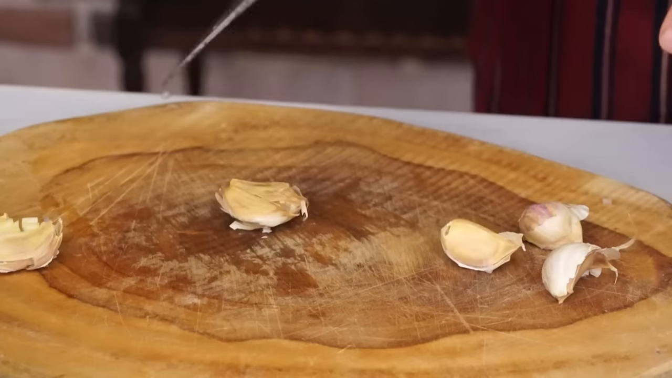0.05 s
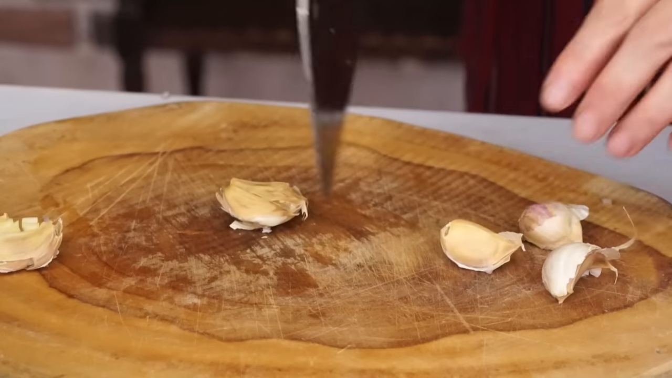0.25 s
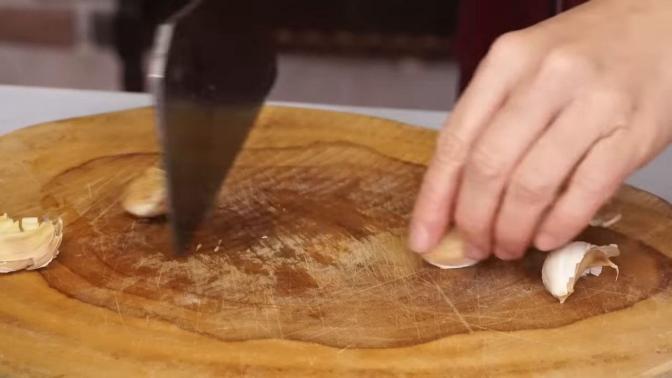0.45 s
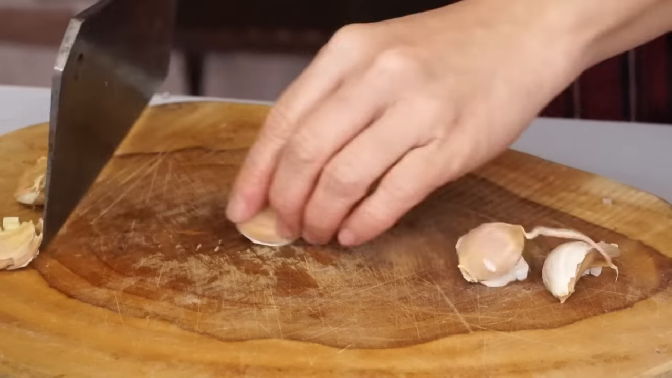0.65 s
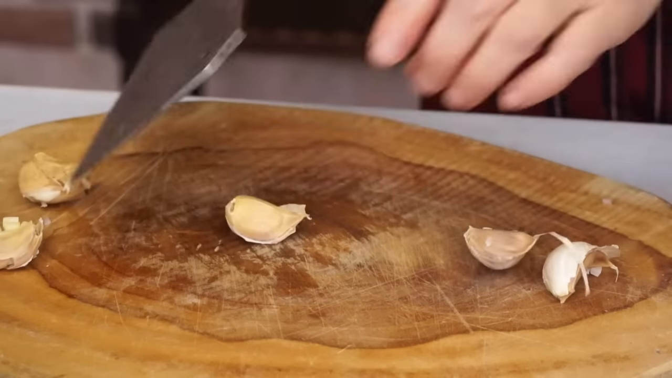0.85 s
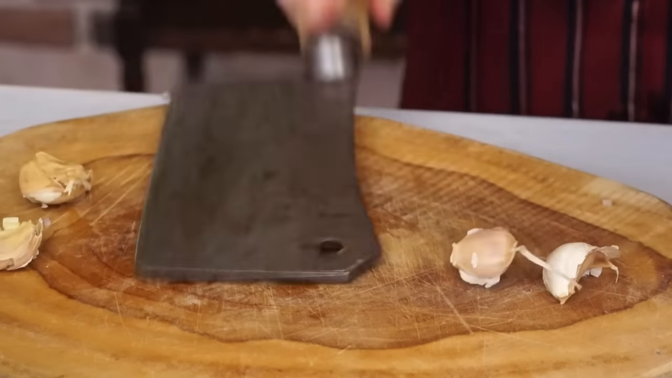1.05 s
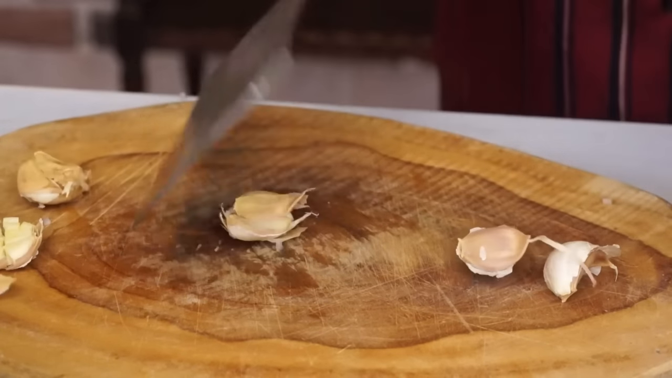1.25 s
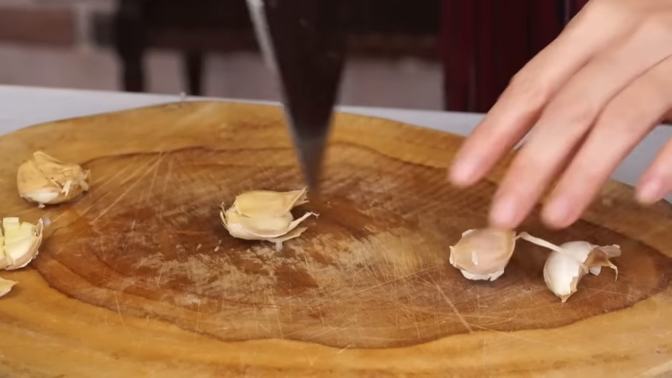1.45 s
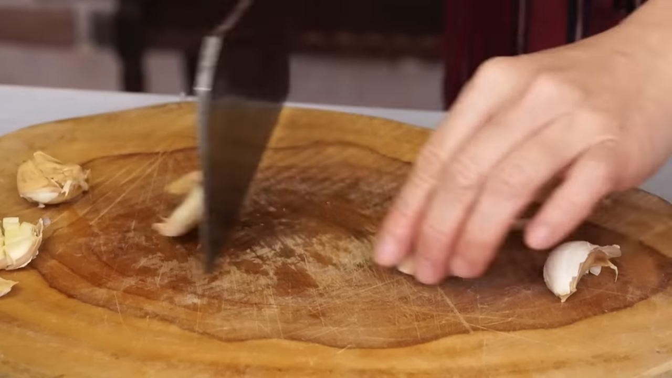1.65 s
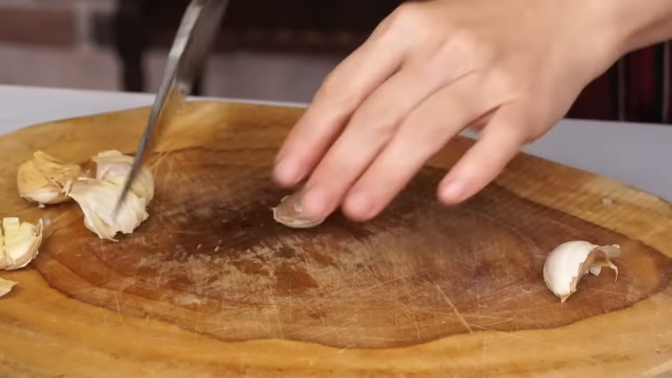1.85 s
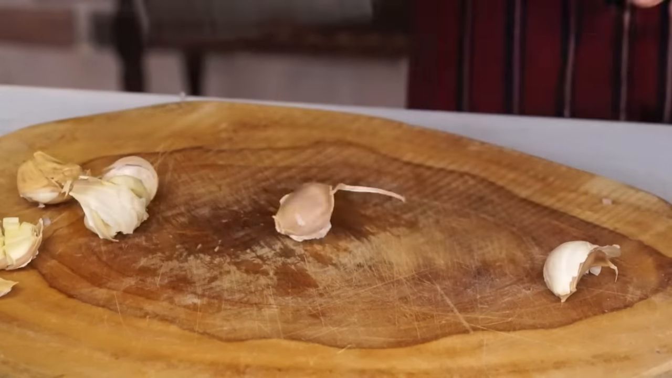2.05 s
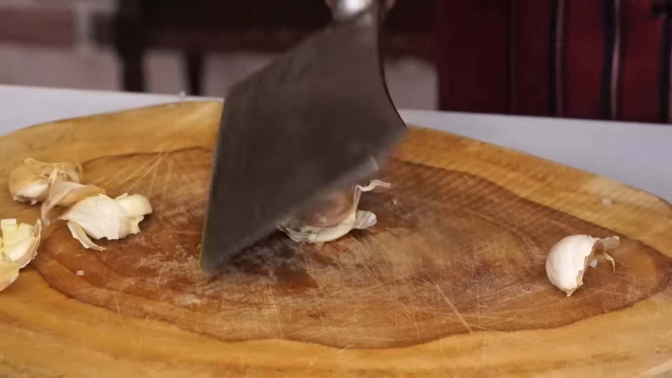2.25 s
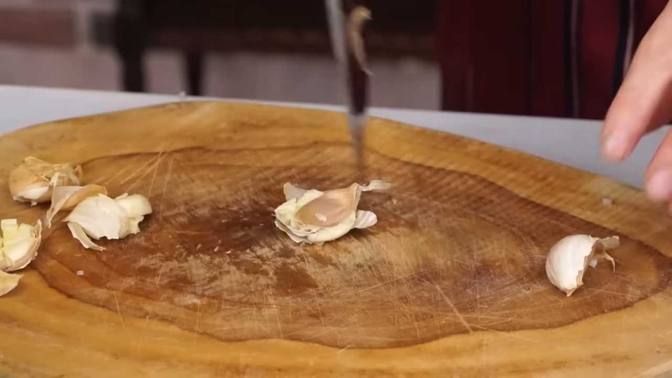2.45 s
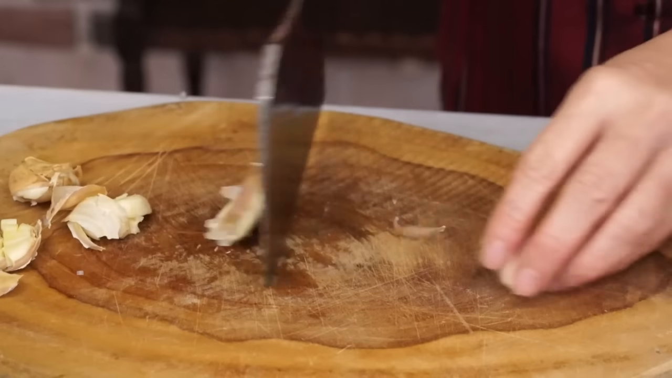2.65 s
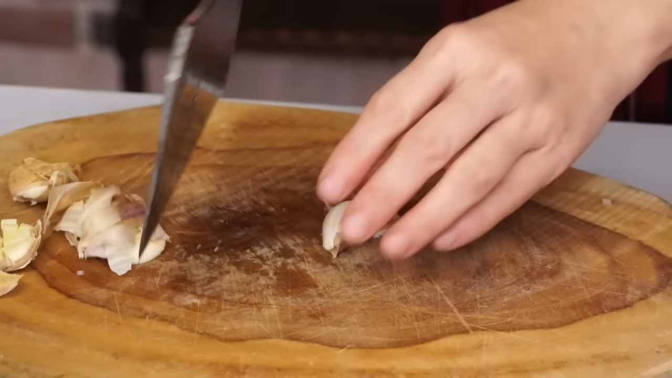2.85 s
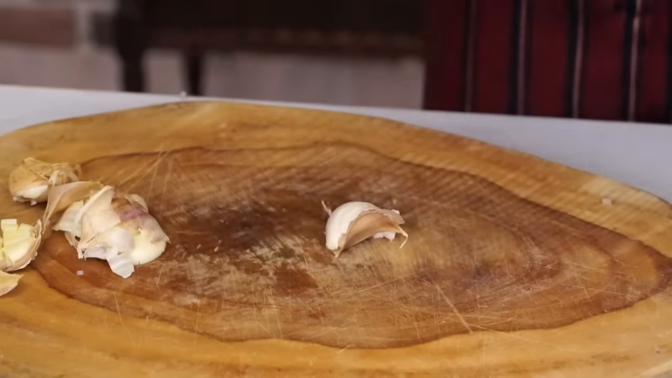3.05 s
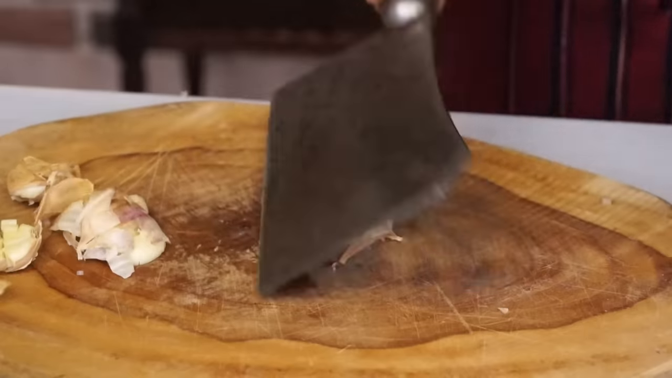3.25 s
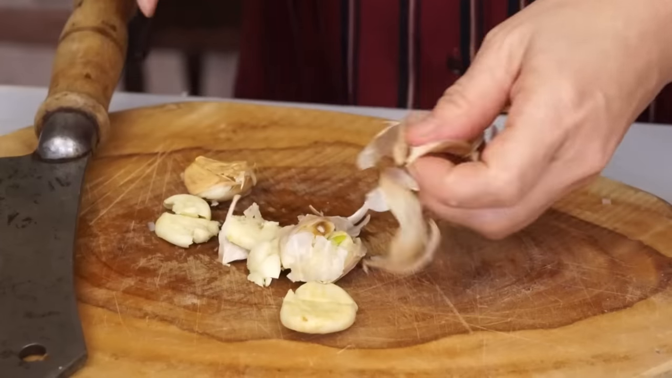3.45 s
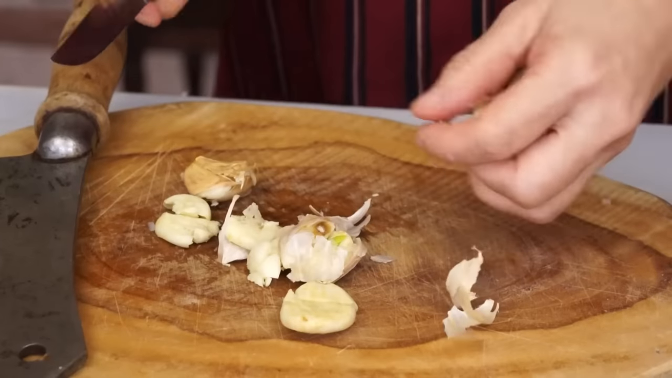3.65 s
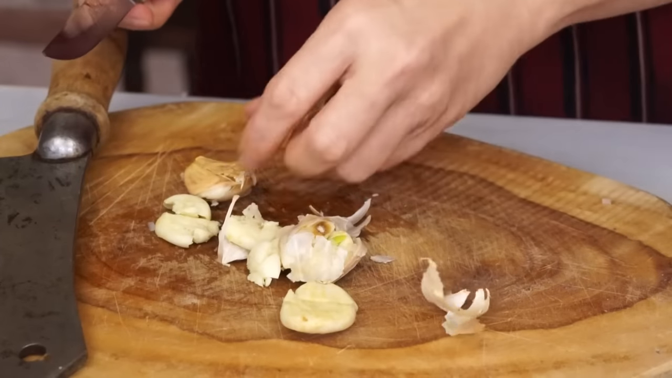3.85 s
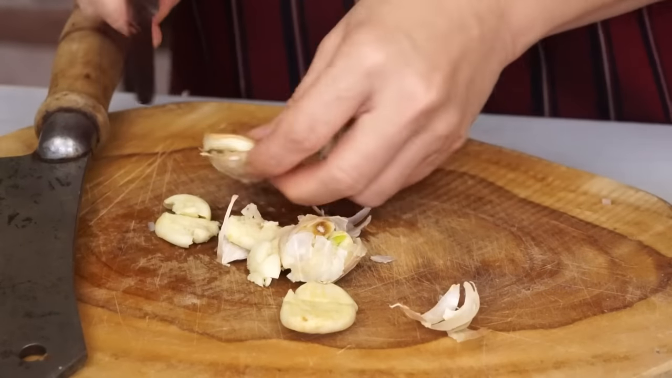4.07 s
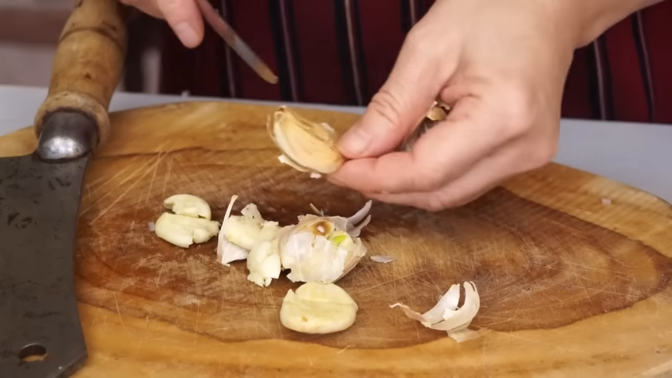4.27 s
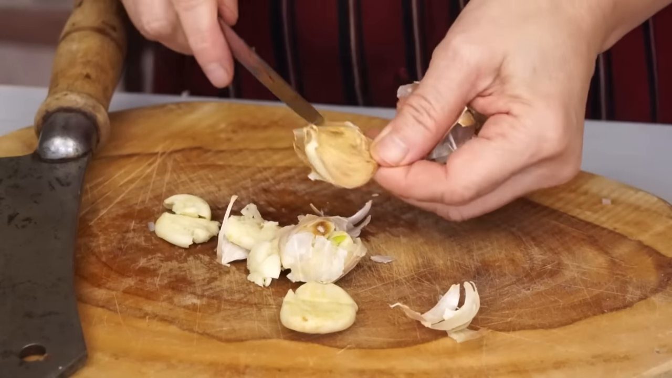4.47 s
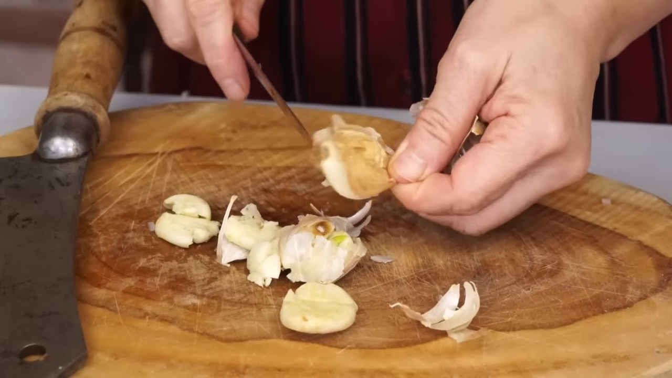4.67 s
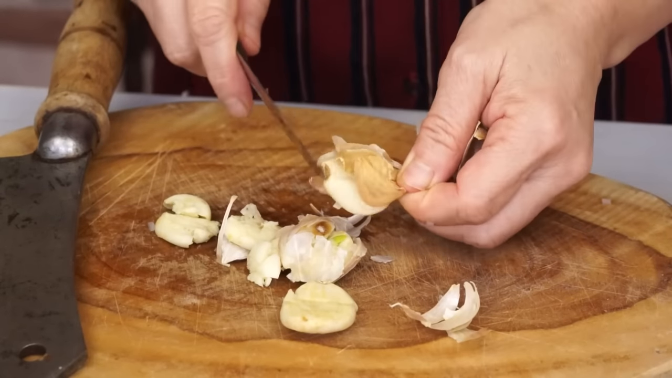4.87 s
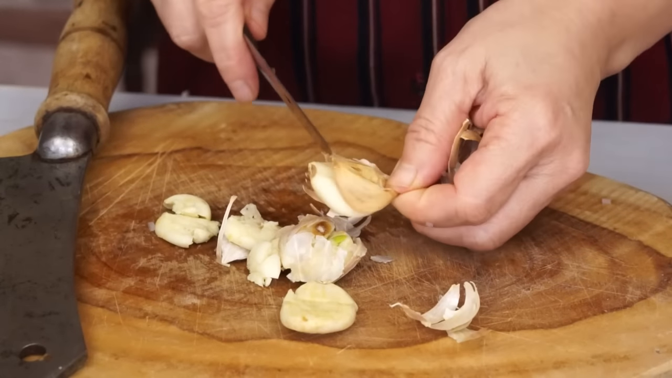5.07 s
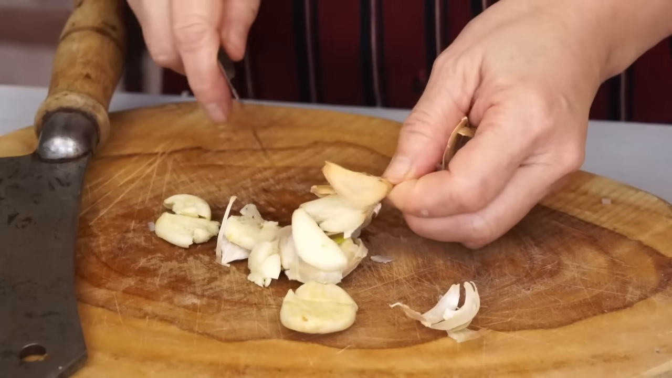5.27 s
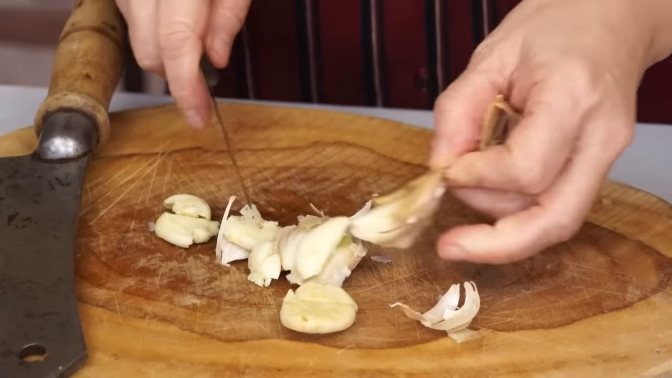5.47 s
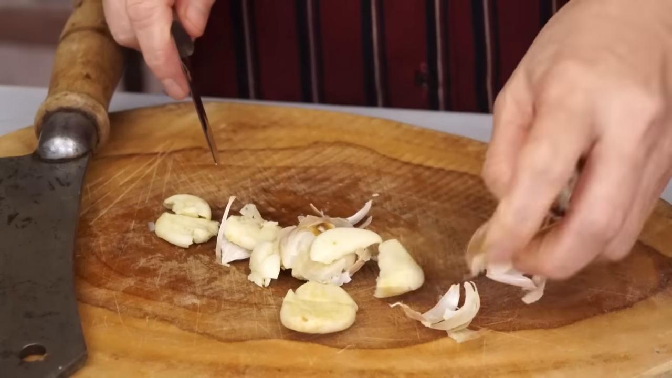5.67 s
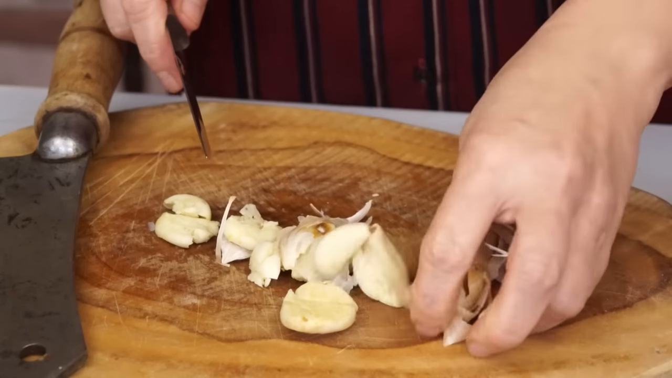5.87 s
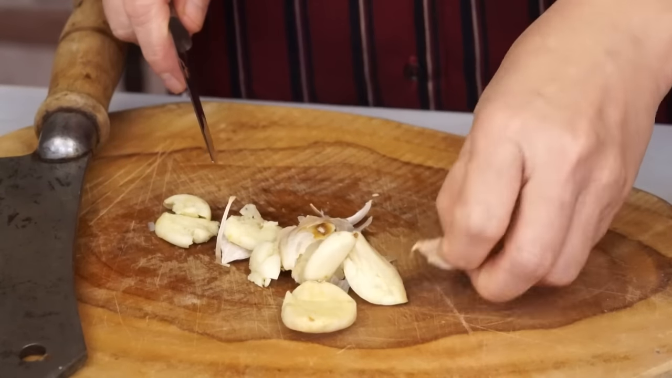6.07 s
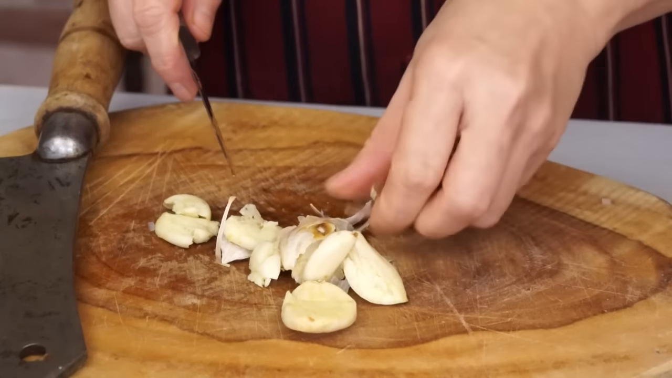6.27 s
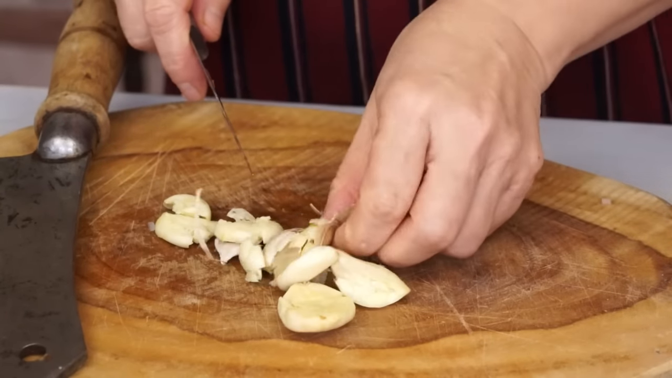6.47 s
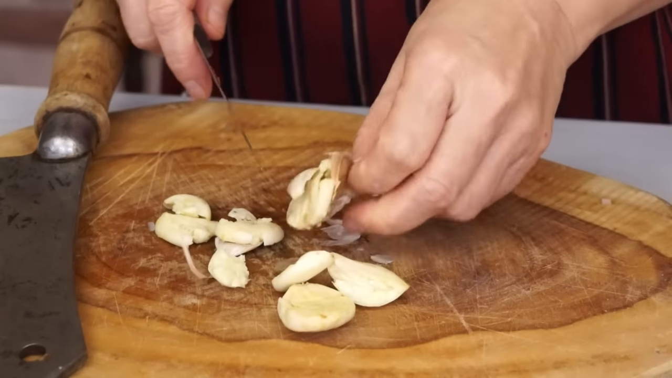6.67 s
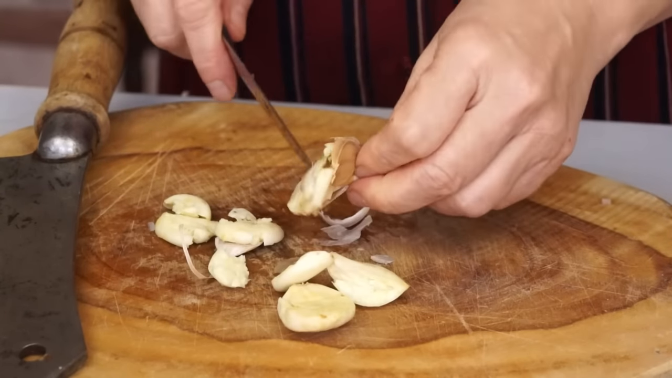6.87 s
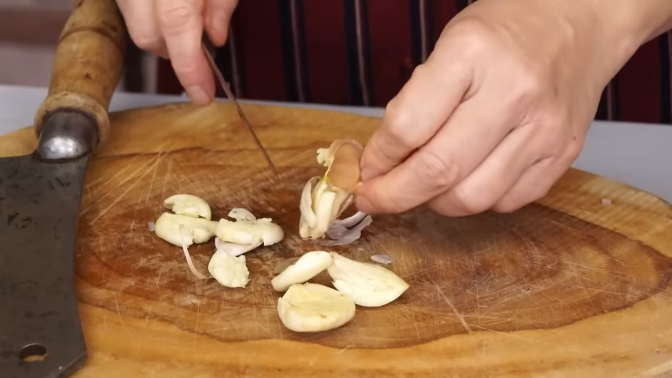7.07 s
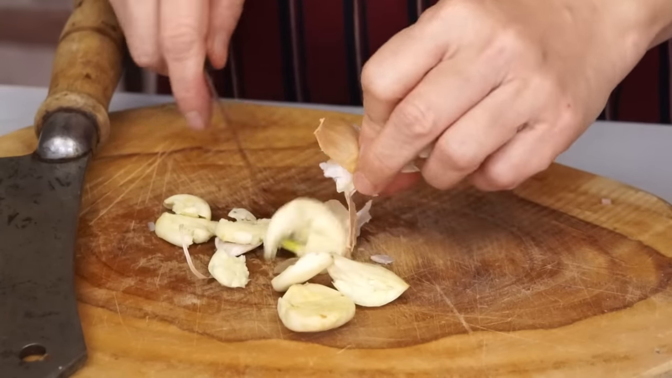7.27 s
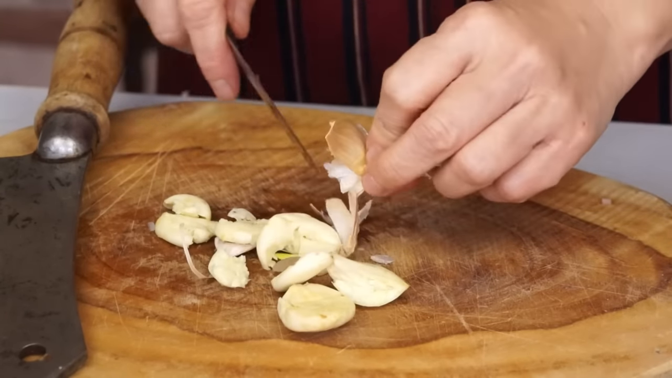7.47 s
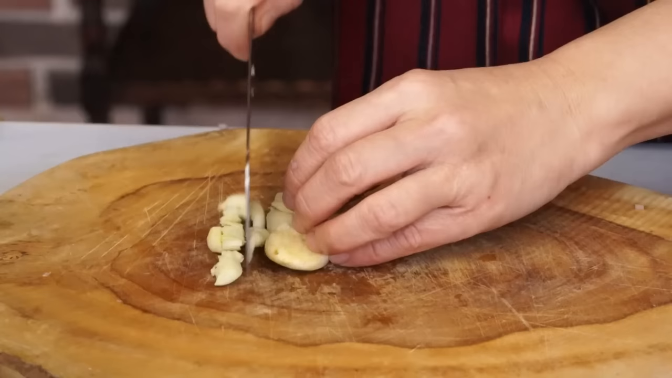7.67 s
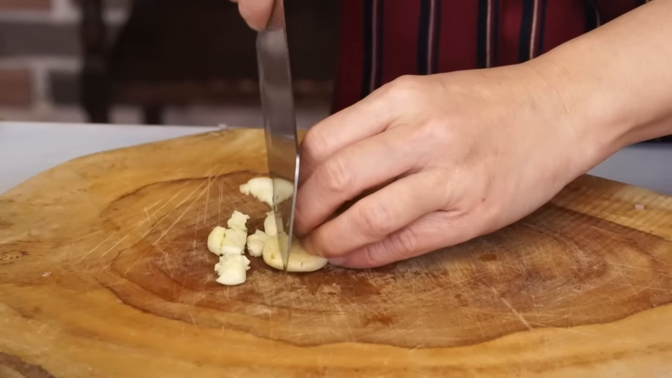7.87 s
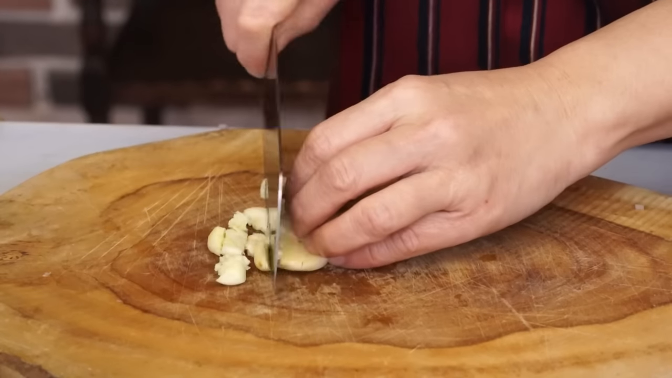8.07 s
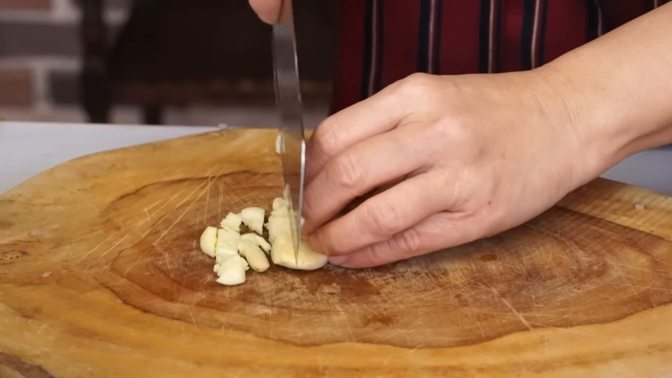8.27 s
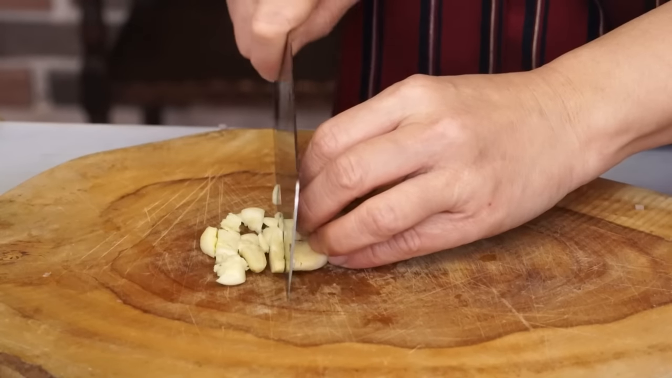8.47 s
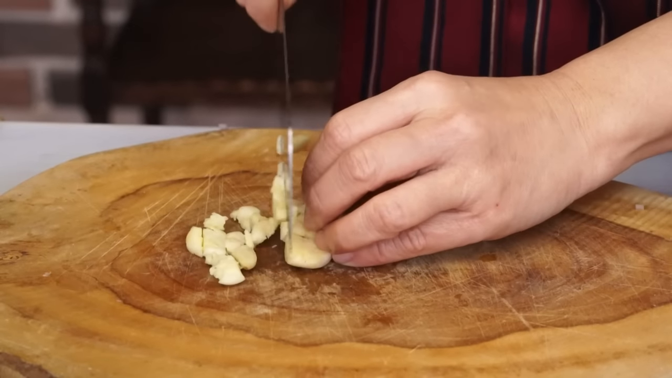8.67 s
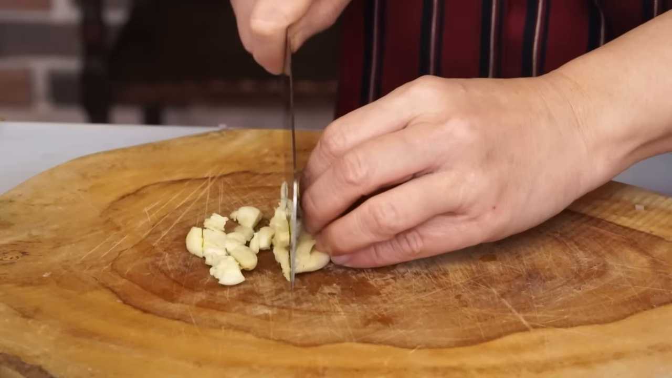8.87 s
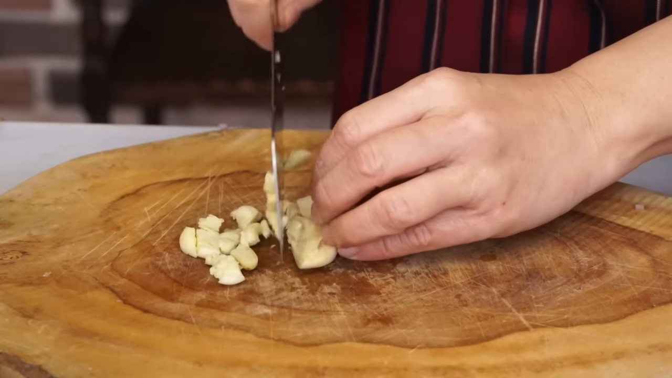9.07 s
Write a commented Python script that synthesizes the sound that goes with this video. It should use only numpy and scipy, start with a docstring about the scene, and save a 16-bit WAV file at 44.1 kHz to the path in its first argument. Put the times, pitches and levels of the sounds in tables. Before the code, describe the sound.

A quiet, fairly live kitchen with low rumble and faint hiss, in close stereo. At 0 s a cleaver edge knocks a thick wooden board with a brief ring. Around 0.45-0.5 s it lands again with low thuds and sharp papery snaps, then scrapes briefly sideways. At 1.1 s the blade slaps and crushes a clove, wet cracks and bright ringing steel. An edge knock at 1.6 s leads into another gritty scrape. A longer crunch and strong ring follow at 2.15 s, a hard woody knock at 2.6 s and scrape, then a third smash at 3.16 s with little ring, cut abruptly at 3.35 s. Until 7.7 s dry skins rustle, crackle and snap finely, busiest around 5-6.3 s, with a short drag near 6 s. A light knock comes at 7.7 s. Knife slices crunch at 8.0, 8.5 and 8.9 s; the first two knock the board firmly, the last softly.

```python
"""Garlic under the cleaver

Quiet, fairly live kitchen, a stereo microphone close to a thick wooden board: room rumble and faint hiss.
A steel cleaver smashes three cloves, cracks and blows over a ringing blade; its edge scrapes garlic aside.
Papery skins crackle and snap under the fingers, then a small knife crunches through a clove onto the board.
Contacts are filtered noise grains; the wood and steel are sums of decaying modes."""
import sys
import numpy as np
from scipy import signal
from scipy.fft import rfft, irfft, next_fast_len
from scipy.io import wavfile
from scipy.ndimage import uniform_filter1d, map_coordinates

SR = 44100
rng = np.random.default_rng(int(sys.argv[2]) if len(sys.argv) > 2 else 0)


def put_to_file(sound):
    """Save the sound as 16-bit audio at rate SR, in the file named by the first command-line argument."""
    columns = np.atleast_2d(sound).T  # one column per channel
    safe = np.clip(columns, -1, 1)
    whole_steps = np.round(safe * 32767)
    wavfile.write(sys.argv[1], SR, whole_steps.astype(np.int16))


N = 402633
TIME = np.arange(N) / SR  # s, through the whole scene
AGE = np.arange(SR) / SR  # s, since a contact


def amp(db):
    """Decibels to gain."""
    return 10 ** (np.asarray(db) / 20)


def unit(x):
    """Scale to rms 1."""
    return x / np.sqrt(np.mean(x ** 2) + 1e-20)


def burst(x):
    """Scale to the energy of 20 ms at rms 1."""
    return x * np.sqrt(SR * .02 / (np.sum(x ** 2) + 1e-20))


def along(points, hz):
    """Read (Hz, value) points on a log frequency axis."""
    f, v = np.transpose(points)
    return np.interp(np.log(hz + 1), np.log(f), v)


def level(rows):
    """Gain per sample from (s, dB) rows, silent beyond 30 ms outside them."""
    s, db = np.transpose(rows)
    inside = (TIME > s[0] - .03) * (TIME < s[-1] + .03)
    return amp(np.interp(TIME, s, db)) * inside


def filtered(x, response):
    """Multiply the spectrum of x by a response of frequency."""
    n = x.shape[-1]
    m = next_fast_len(n + 4096)
    spectrum = rfft(x, m) * response(np.fft.rfftfreq(m, 1 / SR))
    return irfft(spectrum, m)[..., :n]


def coloured(x, spectrum):
    """Filter x by (Hz, dB) points, then scale to rms 1."""
    return unit(filtered(x, lambda hz: amp(along(spectrum, hz))))


def band(x, low_hz, high_hz):
    """A steep causal band-pass."""
    return signal.sosfilt(signal.butter(4, [low_hz, high_hz], "bandpass", fs=SR, output="sos"), x)


def grains(n, rate, spread_db):
    """Tiny fractures of very unequal size, rate a second on average."""
    sizes = rng.standard_normal(n) * amp(spread_db * np.clip(rng.standard_normal(n), -2, 2))
    happens = rng.random(n) < rate / SR
    return unit(sizes * happens)


def patchy(x):
    """Each flake of skin has resonances of its own, so the colour keeps shifting a little."""
    z = signal.stft(x, nperseg=512)[2]
    field = uniform_filter1d(rng.standard_normal(z.shape), size=13, axis=0)  # smooth over frequency
    field = uniform_filter1d(field, size=7, axis=1)  # and over time
    return signal.istft(z * amp(1.6 * unit(field)), nperseg=512)[1][:len(x)]


def add(track, s, x):
    """Mix x into the track from time s."""
    i = round(s * SR)
    x = x[:, max(-i, 0):N - i]
    track[:, max(i, 0):max(i, 0) + x.shape[1]] += x


# low rumble of the room: t/s, level/dB of each of its mid and side parts before the side is narrowed
ROOM_LEVEL = [(0, -67.5), (1, -69), (1.5, -74), (3.34, -73.5), (3.36, -66.5), (7.6, -67.5), (9.2, -65.5)]
# its colour: f/Hz, level/dB per Hz, relative
RUMBLE_COLOUR = [(22, -1.5), (45, 5.5), (70, -2.5), (135, 5), (200, -4.5), (380, -5.5), (800, -13.5),
                 (1600, -16), (4000, -31.5), (16000, -50.5)]
# faint hiss: t/s, level/dB of its centre part
HISS_LEVEL = [(0, -71.5), (1, -73), (1.4, -81), (3.34, -77.5), (3.36, -74.5), (9.2, -70)]
# its colour: f/Hz, level/dB per Hz, relative
HISS_COLOUR = [(300, -2.5), (1500, -1), (3000, 0), (6000, -1.5), (10000, -3.5), (16000, -7.5)]


def background():
    """Low room rumble, nearly alike on both sides, under a faint wide hiss: both coloured noise."""
    mid, side = coloured(rng.standard_normal((2, N)), RUMBLE_COLOUR)
    side = .8 * filtered(side, lambda hz: hz / np.hypot(hz, 600))  # the deep end stays central
    rumble = np.array([mid + side, mid - side])
    centre, wide = coloured(rng.standard_normal((2, N)), HISS_COLOUR)
    hiss = centre + .6 * np.array([wide, -wide])
    return level(ROOM_LEVEL) * rumble + level(HISS_LEVEL) * hiss


# how long the kitchen rings: f/Hz, t60/s
KITCHEN_T60 = [(100, 0.62), (250, 0.36), (600, 0.44), (1400, 0.44), (4000, 0.33), (10000, 0.31),
               (16000, 0.057)]


def kitchen(x, wet_db, width):
    """Direct sound plus a diffuse tail that builds up within milliseconds and dies faster in the treble."""
    hz, t, z = signal.stft(rng.standard_normal((2, SR * 2 // 3)), SR, nperseg=256)
    fades = amp(-60 * t / along(KITCHEN_T60, hz)[:, None])
    tail = signal.istft(z * fades, SR, nperseg=256)[1]
    tail *= 1 - np.exp(-(AGE[:tail.shape[1]] / 0.0011) ** 2)
    mid, side = tail / np.linalg.norm(tail[0])
    # long waves reach both capsules alike
    side = width * filtered(side, lambda f: f ** 2 / (f ** 2 + 300 ** 2))
    room = np.array([mid + side, mid - side])
    return x + amp(wet_db) * signal.fftconvolve(x[None], room, axes=1)[:, :len(x)]


STROKE_ATTACK_S, STROKE_RELEASE_S = .03, 0.047  # of any stroke over the wood


def stroke(s, length):
    """Gain of one stroke over the wood: it swells up to s, holds, and dies away."""
    swell = (np.maximum(s - TIME, 0) / STROKE_ATTACK_S) ** 2
    fade = np.maximum(TIME - s - length, 0) / STROKE_RELEASE_S
    return np.exp(-swell - fade)


# skins rub under the fingers: t/s, level/dB (the rubbing itself plays 1 dB higher)
RUBBING = [(3.38, -67), (3.83, -62.5), (4.25, -72.5), (4.7, -68.5), (5.39, -65), (6.13, -56), (6.25, -62.5),
           (6.6, -61.5), (6.74, -63.5), (7.01, -74.5), (7.12, -68), (7.68, -75.5)]
FLAKES_PER_S, FLAKE_HZ, FLAKE_RISE_S = 7, 7500, .003  # pitch scatters half an octave either way
FLAKE_DB, FLAKE_SPREAD_DB = 6, 5.5  # mean over the RUBBING row, and scatter either way


def flakes():
    """Small snaps at random moments, louder when the fingers rub harder; rows as in SKIN_SNAPS."""
    s, db = np.transpose(RUBBING)
    span = s[-1] - s[0]
    draws = rng.random((100, 3))[:int(FLAKES_PER_S * span)]
    rows = []
    for moment, size, pitch in draws:
        at = s[0] + moment * span
        snap_db = np.interp(at, s, db) + FLAKE_DB + FLAKE_SPREAD_DB * (2 * size - 1)
        rows.append((at, snap_db, FLAKE_HZ * 2 ** (pitch - .5), FLAKE_RISE_S))
    return rows


# a dry skin snaps or tears loudly: t/s, level/dB before a 3 dB cut, centre f/Hz, time to its peak t/s
SKIN_SNAPS = [(0.415, -54.5, 7000, 0.0058), (0.434, -49, 6700, .0013), (.446, -35.5, 6600, 0.003),
              (0.459, -50, 6500, 0.01), (0.494, -33.5, 5940, 0.0052), (.843, -60, 9900, 0.0036),
              (1.027, -53.5, 6030, 0.0038), (1.586, -49.5, 4730, 0.0036), (3.601, -48, 9000, 0.005),
              (3.681, -45.5, 7800, 0.0078), (3.717, -51.5, 8000, .0068), (3.883, -53, 5700, 0.0033),
              (4.07, -57, 4200, 0.0054), (4.437, -56.5, 6800, .0093), (4.679, -52.5, 8000, 0.0088),
              (4.704, -41, 7300, 0.0032), (4.709, -50.5, 1480, 0.0039), (4.955, -42, 10900, .0058),
              (5.008, -46, 8400, .0042), (5.032, -46.5, 11200, .0005), (5.146, -40, 11000, 0.021),
              (5.184, -43, 9700, 0.0033), (5.441, -43.5, 6400, 0.0056), (5.621, -46, 10000, 0.0023),
              (5.872, -47, 5300, 0.0021), (5.926, -42.5, 13000, 0.002), (5.99, -50, 4230, 0.002),
              (6.08, -44, 10900, 0.0018), (6.121, -50, 6050, 0.002), (6.233, -46, 7800, 0.015),
              (6.279, -45.5, 5700, 0.0099), (6.485, -52.5, 4500, 0.013), (6.563, -49.5, 4470, .0026),
              (6.678, -45.5, 12600, 0.00089), (6.935, -41, 8060, 0.023), (7.025, -44.5, 10700, .0017),
              (7.166, -48, 10000, 0.0082), (7.282, -48, 2460, 0.0018), (7.356, -50, 4460, .0028),
              (7.567, -44.5, 9600, .0044), (7.653, -49.5, 9400, 0.0049)]
# colour of papery skin: f/Hz, level/dB per Hz, relative
SKIN_COLOUR = [(290, -31.5), (500, -5), (1020, -6.5), (1550, -3.5), (2130, -5.5), (2290, -2), (4210, -2),
               (11600, 0), (14500, -0.5), (16000, 4.5)]
# fingertips drag loose skins over the wood: t/s, length t/s, level/dB
SKIN_DRAGS = [(5.96, 0.08, -51), (6.42, 0.095, -63)]
# colour of that drag: f/Hz, level/dB per Hz, relative
DRAG_COLOUR = [(60, -34), (130, 11), (260, -3), (400, 16.5), (560, -6), (850, -9), (2500, -15), (4400, 8),
               (7000, 0), (16000, -3)]


def peeling():
    """Papery skin crackles under the fingers and now and then breaks in a short cluster of cracks."""
    crackle = patchy(grains(N, rate=1500, spread_db=5))
    skin = amp(1.0) * level(RUBBING) * coloured(crackle, SKIN_COLOUR)[None]
    pressure = sum(amp(db) * stroke(s, length) for s, length, db in SKIN_DRAGS)
    skin += pressure * coloured(patchy(grains(N, rate=1700, spread_db=6.5)), DRAG_COLOUR)
    t = AGE[:SR // 8]
    for s, db, centre_hz, rise in [*SKIN_SNAPS, *flakes()]:
        cracks = patchy(grains(len(t), rate=9000, spread_db=4)) * t * np.exp(-t / rise)

        def response(hz):
            octaves = np.log2((hz + 1) / centre_hz)
            return amp(along(SKIN_COLOUR, hz)) / np.hypot(1, octaves / 1.3)

        add(skin, s, amp(db - 3) * burst(filtered(cracks, response))[None])
    return kitchen(skin[0], wet_db=-4, width=0.89)


# the knife slices a clove and lands on the board: landing t/s, time in the flesh t/s, push level/dB,
# crunch on entry level/dB, crunch at the end level/dB, thump level/dB, knock level/dB, contact limit f/Hz
# (the push and the thump and knock sound in board(), knocks 5 dB lower than listed)
KNIFE_SLICES = [(8.013, 0.034, -52.5, -48, -45, -33.5, -16.5, 1730),
                (8.468, 0.056, -49, -60.5, -40, -33.5, -19, 1220),
                (8.91, .032, -38.5, -43, -39.5, -50, -38.5, 1400)]
# colour of crisp garlic flesh: f/Hz, level/dB per Hz, relative
FLESH_COLOUR = [(90, -12), (150, 15.5), (300, 3.5), (1200, -2), (2500, -4.5), (5500, -4), (10000, -7.5),
                (16000, -9.5)]
# the knife rests on the clove, bites in, and stops on the wood
TOUCH_S, TOUCH_DB, BITE_S, STOP_S = .07, -67, 0.016, 0.035


def slicing():
    """Crisp cells burst ahead of the knife, louder as it nears the board."""
    effort = np.zeros(N)
    for s, cut, _, entry_db, end_db, *_ in KNIFE_SLICES:
        bite = s - cut
        stages = [bite - TOUCH_S, bite - BITE_S, bite, s, s + STOP_S]
        levels = [TOUCH_DB, TOUCH_DB, entry_db, end_db, TOUCH_DB]
        effort += amp(np.interp(TIME, stages, levels, left=-np.inf, right=-np.inf))
    crunch = effort * coloured(grains(N, rate=3400, spread_db=1), FLESH_COLOUR)
    return kitchen(crunch, wet_db=-5.5, width=0.87)


# the edge sweeps the garlic aside: t/s, length t/s, scrape level/dB before a 2.5 dB cut,
# blade ring level/dB, f/Hz rung most strongly, hum level/dB
EDGE_SWEEPS = [(.555, .11, -58, -59.5, 1743, -89), (1.63, .11, -58, -53.5, 3980, -67),
               (2.66, 0.12, -50.5, -52, 4400, -56.5)]
# colour of steel on wood fibres: f/Hz, level/dB per Hz, relative
GRIT_COLOUR = [(1060, -26.5), (1800, -1), (2410, -7.5), (3810, -10), (6360, -6), (7420, -11.5), (8590, -11),
               (16000, -13.5)]


def sweeps():
    """The edge catches on wood fibres as it pushes the garlic aside."""
    catches = grains(N, rate=6000, spread_db=3)
    pressure = sum(amp(db) * stroke(s, length) for s, length, db, *_ in EDGE_SWEEPS)
    scrape = amp(-2.5) * pressure * coloured(catches, GRIT_COLOUR)
    return kitchen(scrape, wet_db=-4.0, width=1.0)


# the board on its table: f/Hz, level/dB relative, t60/s
BOARD_MODES = [(131.3, -12, 0.23), (165, -0.5, 0.04), (263.4, -14.5, 0.16), (371.4, -3.5, 0.055),
               (410, 0, 0.027), (477.4, -5, 0.038), (605.5, -4, 0.031), (790, 1, 0.029), (958, 1, 0.026),
               (1112, 3, 0.032), (1303, 2.5, 0.02), (1880, 2, 0.01), (2336, -0.5, 0.035),
               (2510, 1.5, 0.034)]


def board_modes():
    """The board's decaying modes after one push, a row each; neighbours swing in opposite senses."""
    hz, db, t60 = np.transpose(BOARD_MODES)[:, :, None]
    t = AGE[:SR * 3 // 4]
    sense = -np.cos(np.pi * np.arange(len(BOARD_MODES)))[:, None]
    return sense * amp(db - 60 * t / t60) * np.sin(2 * np.pi * hz * t)


# the cleaver's edge comes down on the board: t/s, thump level/dB, knock level/dB, contact limit f/Hz,
# ring level/dB, f/Hz rung most strongly, hum level/dB (knocks play 5 dB lower)
EDGE_LANDINGS = [(-.03, -50, -32.5, 2670, -41.5, 1410, -62), (.446, -34, -38.5, 382, -52.5, 2980, -56),
                 (.497, -35.5, -36, 440, -44.5, 4500, -58.5), (1.586, -33, -27, 910, -61.5, 6000, -68),
                 (2.58, -28, -20, 1500, -55.5, 2750, -65)]
# a clove gives way in steps, each a blow on the board: share of the time to reach it,
# thump level/dB and knock level/dB over the smash's board level, contact limit f/Hz
CLOVE_COLLAPSE = [(0, -3, -17.5, 2200), (.5, 3.5, 8.5, 1000), (1.001, -5, 12.5, 630)]
# a short knock sounds at 7.69 s: t/s, thump level/dB, knock level/dB (plays 5 dB lower), contact limit f/Hz
LIGHT_KNOCK = (7.691, -60, -41, 2000)
# this far into a sweep the edge catches and jolts the board
CATCH_SHARE, CATCH_THUMP_DB, CATCH_KNOCK_DB, CATCH_HZ = 0.69, -50.5, -53, 456
PUSH_KNOCK_DB, PUSH_HZ = -7, 600  # the bite pushes the board softly through the clove; dB over the push


def blows():
    """Every blow on the board, as (s, thump dB, knock dB, contact limit Hz)."""
    rows = [landing[:4] for landing in EDGE_LANDINGS] + [LIGHT_KNOCK]
    for s, _, _, _, fall, db, *_ in CLOVE_SMASHES:
        for share, thump_db, knock_db, hz in CLOVE_COLLAPSE:
            rows.append((s + share * fall, db + thump_db, db + knock_db, hz))
    for s, length, *_ in EDGE_SWEEPS:
        rows.append((s + CATCH_SHARE * length, CATCH_THUMP_DB, CATCH_KNOCK_DB, CATCH_HZ))
    for s, cut, push_db, _, _, thump_db, knock_db, hz in KNIFE_SLICES:
        rows.append((s - cut, push_db, push_db + PUSH_KNOCK_DB, PUSH_HZ))
        rows.append((s, thump_db, knock_db, hz))
    return rows


def board():
    """A blow's weight rocks the board on the table; harder contacts reach its higher modes."""
    out, modes, hz = np.zeros((2, N)), board_modes(), np.transpose(BOARD_MODES)[0]
    t = AGE[:modes.shape[1]]
    rocking = hz < 200
    for s, thump_db, knock_db, contact_hz in blows():
        strength = amp(rng.normal(0, 1, len(hz))) / np.hypot(1, (hz / contact_hz) ** 3)
        thump = burst(band((strength * rocking) @ modes, low_hz=93, high_hz=613))
        knock = burst(band((strength * ~rocking) @ modes, low_hz=290, high_hz=3040))
        # the edge bites into the wood
        fibres = coloured(rng.standard_normal(len(t)), GRIT_COLOUR) * amp(-60 * t / 0.038)
        knock = knock + amp(-28.0) * burst(fibres)
        add(out, s, kitchen(amp(thump_db) * thump, wet_db=-9, width=.3))
        add(out, s, kitchen(amp(knock_db - 5.0) * knock, wet_db=-3.5, width=0.44))
    return out


# the cleaver's blade: f/Hz, level/dB relative, t60/s when free
BLADE_MODES = [(4517, -1, .48), (6372, 3, .27), (8598, -7, .27), (2972, -12, .45), (3560, -11, .38),
               (1249, -7, .42), (1885, -9, .45), (2503, -10, .33), (5150, -17, .39), (6767, -19, .27),
               (11000, -14, .22)]
DAMPING = 1.19  # of the ring by garlic and grip: 1 = free
# one bending mode that hums; the waver is a random swing of its level
HUM_HZ, HUM_ATTACK_S, HUM_T60_S, HUM_WAVER_DB = 1642, 0.035, 0.78, 4


def blade():
    """Steel rings on after each contact, whose place decides which modes speak most; one hums and wavers."""
    out, hum = np.zeros((2, N)), np.zeros((1, N))
    hz, db, t60 = np.transpose(BLADE_MODES)
    catches = [(s + CATCH_SHARE * length, *rest) for s, length, *rest in EDGE_SWEEPS]
    for s, *_, ring_db, centre_hz, hum_db in [*CLOVE_SMASHES, *EDGE_LANDINGS, *catches]:
        strength = amp(db) / (1 + (np.log2(hz / centre_hz) / .33) ** 2)
        fades = amp(-60 * DAMPING * AGE / t60[:, None]) * (1 - np.exp(-AGE / .004))
        drift = .008 * np.cumsum(rng.standard_normal(fades.shape), axis=1)  # phase wanders, radians
        swings = np.sin(2 * np.pi * hz[:, None] * AGE + drift)
        ring = burst(strength @ (fades * swings))
        add(out, s, kitchen(amp(ring_db) * ring, wet_db=-7.5, width=0.98))
        swell = 1 - np.exp(-AGE / HUM_ATTACK_S)
        add(hum, s, (amp(hum_db - 60 * AGE / HUM_T60_S) * swell)[None])
    waver = map_coordinates(rng.standard_normal(120), [12 * TIME])  # 12 random points a second
    return out + hum * amp(HUM_WAVER_DB * waver) * unit(np.sin(2 * np.pi * HUM_HZ * TIME))


# the flat of the blade hits a clove: t/s, slap level/dB, crush level/dB before a 6.5 dB lift,
# crush length t/s, time to reach the board t/s, board level/dB, ring level/dB, f/Hz rung most strongly,
# hum level/dB
CLOVE_SMASHES = [(1.11, -38, -35, 0.0096, .021, -36.5, -27, 4900, -57),
                 (2.139, -32.5, -34.5, 0.082, 0.061, -37, -26.5, 7150, -54),
                 (3.163, -30, -43.5, .079, 0.057, -41, -52.5, 2780, -60.5)]
# colour of slap and crush: f/Hz, level/dB per Hz, relative
CRUSH_COLOUR = [(40, 7.5), (90, 3.5), (210, -3.5), (370, 2.5), (520, -6.5), (800, -6), (1400, -3.5),
                (1900, 1.5), (2300, -5.5), (3300, -4), (7000, -10.5), (11000, -13), (16000, -16.5)]


def smashes():
    """The blade slaps the clove, which collapses in a dense run of wet cracks that drum on the board."""
    out, wood = np.zeros((2, N)), band(board_modes().sum(axis=0), low_hz=83.5, high_hz=960)
    for s, slap_db, crush_db, length, *_ in CLOVE_SMASHES:
        slap = burst(coloured(grains(SR, rate=12000, spread_db=-3), CRUSH_COLOUR) * amp(-60 * AGE / 0.027))
        cracks = grains(SR, rate=5100, spread_db=2.5) * np.exp(-(AGE / length) ** 2)
        drumming = burst(signal.fftconvolve(cracks, wood)[:SR])
        crush = burst(coloured(cracks, CRUSH_COLOUR)) + amp(-13.5) * drumming
        both = amp(slap_db) * slap + amp(crush_db + 6.5) * crush
        both = filtered(both, lambda hz: hz ** 2 / (hz ** 2 + 80 ** 2))
        add(out, s, kitchen(both, wet_db=2.5, width=0.48))
    return out


CUT_S = 3.349  # the ringing of cleaver and board is cut off here


def scene():
    """The ringing of cleaver and board is cut off, their layers return from 4.5 s; the others play on."""
    heard = 1 - np.interp(TIME, [CUT_S - .002, CUT_S + .002, 4.5, 4.6], [0, 1, 1, 0])
    cleaver_and_board = board() + smashes() + blade() + sweeps()
    return heard * cleaver_and_board + peeling() + slicing() + background()


# the two capsules: f/Hz, left minus right level/dB
CAPSULE_BALANCE = [(120, 0), (280, .7), (1000, -1.5), (4000, -1), (8000, -3), (13000, -4)]
TOP_HZ = 15850  # band limit of the recorder


def record(dry):
    """The right capsule hears more of the treble; the recorder keeps nothing above its band limit."""
    def response(hz):
        balance = amp(along(CAPSULE_BALANCE, hz) * np.array([[.5], [-.5]]))
        return balance / np.hypot(1, (hz / TOP_HZ) ** 90)

    return filtered(dry, response)


dry = scene()
out = record(dry)
put_to_file(out)
```